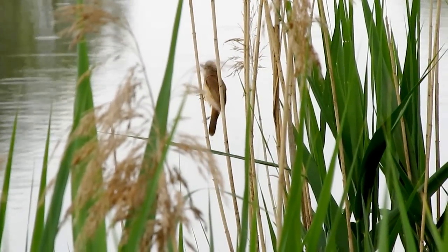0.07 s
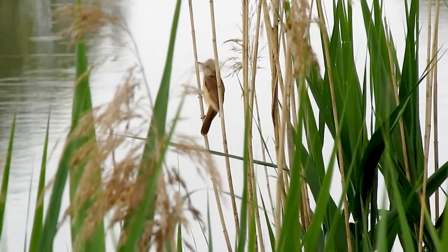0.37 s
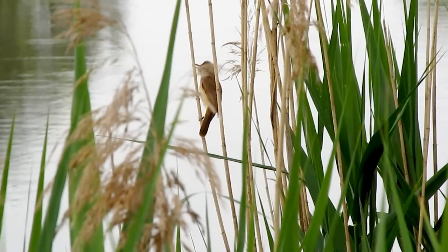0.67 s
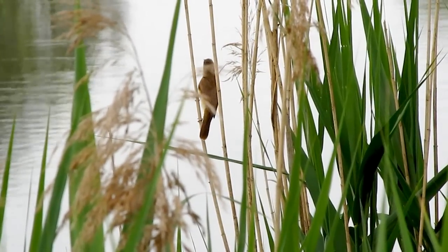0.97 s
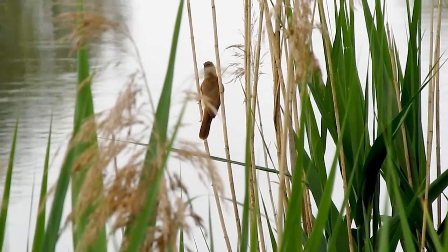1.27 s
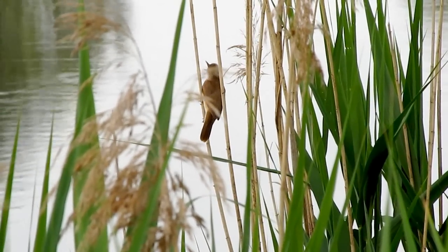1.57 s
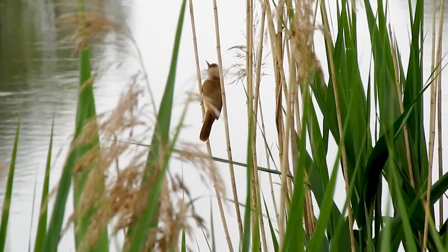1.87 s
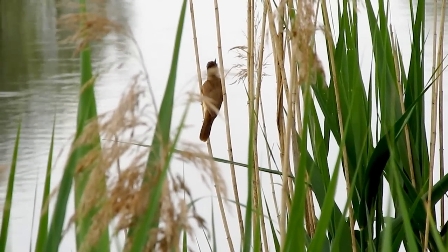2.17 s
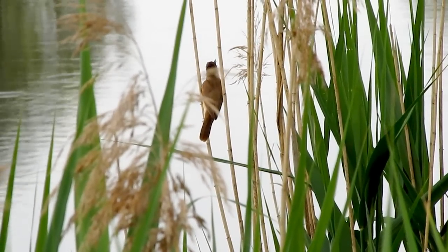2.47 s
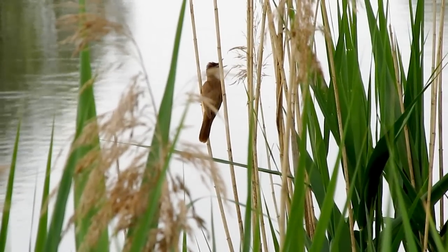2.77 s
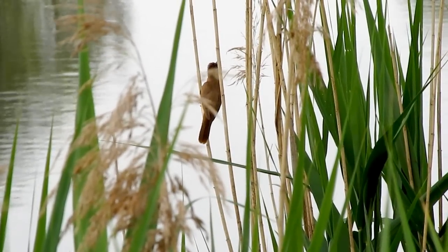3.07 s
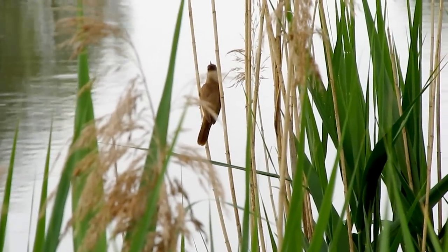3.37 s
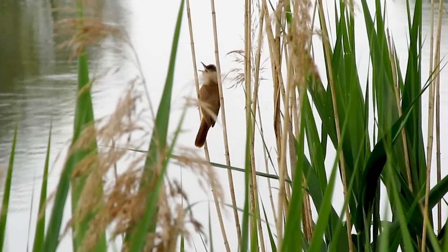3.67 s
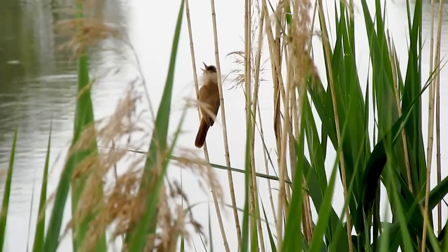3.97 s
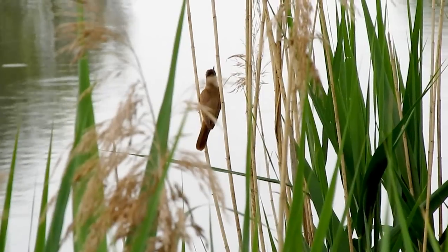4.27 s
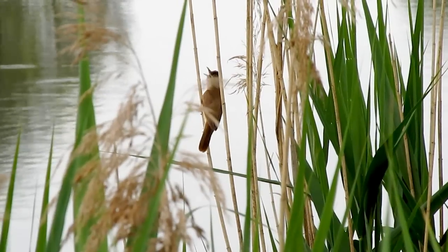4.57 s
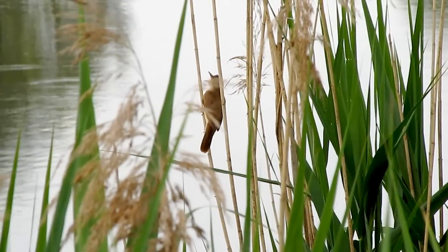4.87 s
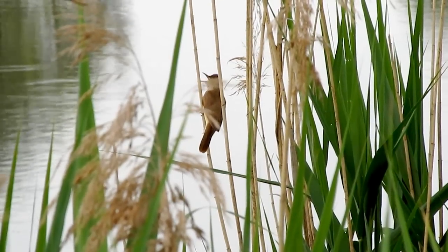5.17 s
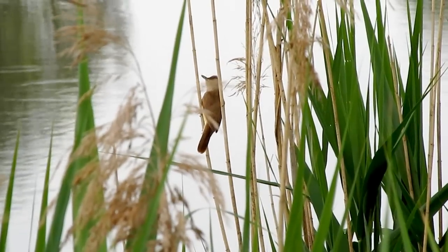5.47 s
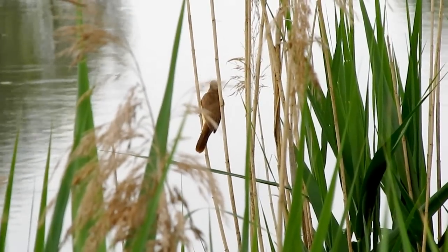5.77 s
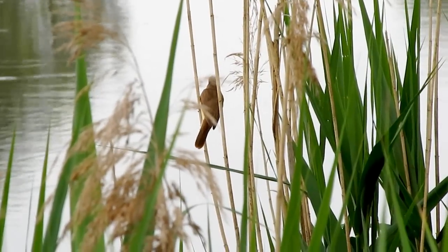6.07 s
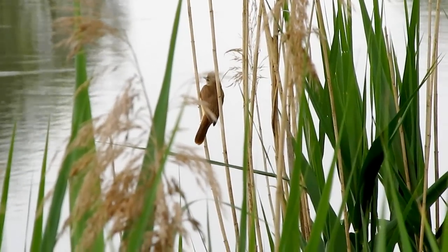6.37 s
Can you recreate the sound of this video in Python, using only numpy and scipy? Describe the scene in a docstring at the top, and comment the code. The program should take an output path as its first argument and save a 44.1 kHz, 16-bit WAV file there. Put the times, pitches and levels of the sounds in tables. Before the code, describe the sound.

Loud, harsh warbler song of dry ticks, rolling rattles and repeated squeaky notes, with other birds faint in the distance.

```python
"""Over a faint outdoor hush and a far chirp, a reed warbler starts ticking dryly beside a pond.
It builds into harsh rattles and repeated squeaky syllables as its syrinx flips between clean tones
and chaotic pulsing that rings its throat and beak. Water, reeds and the far bank answer the song.
Other birds chirp, whistle and twitter in the distance, and one soft knock falls near the end.
A fast limiter holds down the loudest notes."""
import sys
import numpy as np
from scipy import signal
from scipy.fft import rfft, irfft, next_fast_len
from scipy.io import wavfile
from scipy.ndimage import uniform_filter1d, minimum_filter1d, map_coordinates

SR = 44100
rng = np.random.default_rng(int(sys.argv[2]) if len(sys.argv) > 2 else 0)


def output_pcm(signal):
    """Save a mono or channel-first signal as 16-bit PCM at the path in sys.argv[1].

    Samples are clipped to [-1, 1] before scaling.
    """
    pcm = np.clip(np.atleast_2d(signal).T, -1, 1) * 32767
    wavfile.write(sys.argv[1], SR, np.round(pcm).astype(np.int16))


N = 283122


def amp(db):
    """Decibels to gain."""
    return 10 ** (np.asarray(db) / 20)


def unit(x):
    """Scale to rms 1."""
    return x / np.sqrt(np.mean(x ** 2) + 1e-20)


def along(points, hz):
    """Read a curve of (freq_hz, value) points on a log frequency axis."""
    freqs, values = np.transpose(points)
    return np.interp(np.log(hz + 1), np.log(freqs + 1), values)


def wobble(rate, size):
    """A smooth random curve with rate knots a second."""
    knots = rng.standard_normal(int(size * rate / SR) + 4)
    return map_coordinates(knots, [np.arange(size) * rate / SR])


def filtered(x, response):
    """Equalise x with a gain that is a function of frequency."""
    size = next_fast_len(N + SR // 2)
    return irfft(rfft(x, size) * response(np.fft.rfftfreq(size, 1 / SR)), size)[..., :N]


def add(track, start_s, sound):
    """Mix a sound into a track."""
    part = track[..., max(round(start_s * SR), 0):][..., :sound.shape[-1]]
    part += sound[..., :part.shape[-1]]


# Colour of the ambience: freq_hz, level_db
HUSH_SPECTRUM = [(15, -43), (25, -11), (65, -2), (331, -4.5), (598, -6.5), (1950, -9.5), (2850, -6.5),
                 (3340, -10.5), (5010, -13.5), (13000, -27.5), (15500, -37)]
# How alike its left and right are: freq_hz, correlation
HUSH_LIKENESS = [(60, 0.51), (950, 0.15), (15000, -0.42)]

def hush(level_db=-45.5, patchy_db=2.5):
    """Faint air, water and far-off country noise, gently patchy and narrowest in the bass."""
    spectra = signal.stft(rng.standard_normal((2, N)), nperseg=512)[2]
    patches = uniform_filter1d(rng.standard_normal(spectra.shape[1:]), size=5, axis=0)
    patches = uniform_filter1d(patches, size=14, axis=1)
    noise = signal.istft(spectra * amp(patchy_db * unit(patches)), nperseg=512)[1][:, :N]
    width = lambda hz: np.arccos(np.clip(along(HUSH_LIKENESS, hz), -1, 1)) / 2
    colour = lambda hz: amp(along(HUSH_SPECTRUM, hz)) * [np.cos(width(hz)), np.sin(width(hz))]
    mid, side = filtered(noise, colour)
    return amp(level_db) * np.array([mid + side, mid - side]) / np.std(mid)


def whistle(pitch):
    """A small bird's pure note, with soft ends and a slightly unsteady level."""
    size = len(pitch)
    level = amp(2 * wobble(90, size)) * signal.windows.tukey(size, .5)
    return np.sqrt(2) * np.sin(2 * np.pi * np.cumsum(pitch) / SR) * level


# Far chirps: start_s, length_s, first_hz, last_hz, level_db
CHIRP_NOTES = [(0.108, 0.055, 2900, 2600, -42.5), (0.552, 0.105, 3140, 2640, -42.5),
               (0.876, 0.017, 6500, 4900, -44), (.884, .036, 3650, 3020, -48),
               (0.901, 0.029, 6850, 4500, -37), (.931, 0.034, 7080, 5270, -35),
               (1.395, 0.04, 6500, 5370, -47), (4.825, .045, 2250, 2700, -42),
               (4.863, 0.021, 3106, 2880, -29), (5.012, .04, 2220, 2700, -39),
               (5.765, .042, 3100, 3170, -47), (6.148, .05, 3580, 3520, -48)]

def distant_chirps():
    """Short notes whose pitch bends ever faster."""
    out = np.zeros(N)
    for start_s, length_s, first_hz, last_hz, db in CHIRP_NOTES:
        progress = np.linspace(0, 1, int(length_s * SR))
        add(out, start_s, amp(db) * whistle(first_hz + (last_hz - first_hz) * progress ** 1.7))
    return out


def ring(spectrum, size=1024):
    """The minimum-phase ring that one pulse leaves in a cavity with this spectrum."""
    cepstrum = irfft(np.log(amp(along(spectrum, np.fft.rfftfreq(size, 1 / SR)))))
    causal_fold = 1 + np.sign(size // 2 - np.arange(size)) * (np.arange(size) > 0)
    return irfft(np.exp(rfft(cepstrum * causal_fold)))


def rasp(throat, size, slap_hz=1150, uneven=.45, air=.012, steady_s=.005):
    """Chaotic syrinx: uneven slaps ring the throat, at the steady power that the air flow supplies."""
    gaps = np.exp(uneven * rng.standard_normal(int(2 * size * slap_hz / SR) + 8))
    at = np.cumsum(gaps) * SR / slap_hz
    slaps = np.bincount(at[at < size].astype(int), minlength=size) + air * rng.standard_normal(size)
    voice = signal.fftconvolve(slaps, ring(throat))[:size]
    power = np.abs(uniform_filter1d(voice ** 2, int(steady_s * SR)))
    return voice / np.sqrt(power + 1e-12)


def rattle(puffs, throat, length_s, edge, tail_db, tail_s=.0061, lead_s=.0011, split_hz=5500):
    """Puffs of air drive the rasp; each starts bright and dies away in a short, dull tail."""
    t = np.arange(N) / SR
    body_power, treble_power = np.zeros((2, N))
    puff = lambda age: np.exp(-np.abs(2 * age / length_s) ** edge / 2)  # a higher edge is squarer
    for centre_s, db in puffs:
        near = slice(max(int((centre_s - .1) * SR), 0), int((centre_s + .1) * SR))
        age = t[near] - centre_s
        tail = amp(tail_db) * (age > 0) * np.exp(-np.abs(age) / (2 * tail_s))
        body_power[near] += (amp(db) * np.maximum(puff(age), tail)) ** 2
        treble_power[near] += 2 * (amp(db) * puff(age) * puff(age + lead_s)) ** 2
    voice = rasp(throat, N)
    body = filtered(voice, lambda hz: 1 / (1 + (hz / split_hz) ** 10))
    return np.sqrt(body_power) * body + np.sqrt(treble_power) * (voice - body)


def beats(phrases, rhythm):
    """Play one rhythm in every phrase, giving puffs as (centre_s, level_db)."""
    return [(accent_s + stretch * offset_s, phrase_db + db)
            for accent_s, phrase_db, stretch in phrases for offset_s, db in rhythm]


# Tick phrases: accent_s, level_db, stretch_ratio
TICK_PHRASES = [(.238, -23.5, .9), (.466, -21, .9), (.697, -18.5, 1)]
# Puffs of one phrase: offset_s, level_db
TICK_PUFFS = [(-.042, -22.5), (-.019, -8), (0, -0.5), (0.027, -12)]
# Throat and beak resonance, also for kreks and grunts: freq_hz, gain_db
TICK_THROAT = [(600, -44), (850, -31.5), (1120, -17), (1400, -19), (1800, -11.5), (2050, -1.5), (2640, -9),
               (3200, -13), (5300, -38.5), (15000, -60.5)]

def ticks():
    """Dry ticks: three puffs grow quickly to the accent and a soft one trails."""
    return rattle(beats(TICK_PHRASES, TICK_PUFFS), TICK_THROAT, length_s=.0135, edge=6, tail_db=-18)


def gesture(attack_s, hold_s, release_s, swell=2, ebb=.66, glide_per_s=0, scoop=0, droop=0,
            droop_power=2, rough=.02, fray=.45, crack=0, crack_s=0, sag_db=0, sag_s=0):
    """One push of air swells, holds and ebbs; the tone scoops, glides, droops and frays at its ends."""
    t = np.arange(-attack_s - hold_s / 2, hold_s / 2 + release_s, 1 / SR)  # 0 is mid-hold
    rise = np.clip((-t - hold_s / 2) / attack_s, 0, 1)
    fall = np.clip((t - hold_s / 2) / release_s, 0, 1)
    position = np.linspace(-1, 1, len(t))
    scooping = scoop * np.maximum(-position, 0) ** 3.76
    drooping = droop * np.maximum(position, 0) ** droop_power
    cracking = crack * np.exp(-((t - crack_s) / .0045) ** 2)  # a brief rasp that kicks the pitch up
    pitch_ratio = 1 + glide_per_s * t + .045 * cracking - scooping - drooping
    sag = sag_db * np.exp(-((t - sag_s) / .003) ** 2)
    effort_db = -24 * (rise ** swell + fall ** ebb) - sag
    roughness = np.clip(rough + fray * (rise + fall) ** 3.04 + cracking, 0, 1)
    return t, pitch_ratio, effort_db, roughness


def syllables(notes, shape, harmonics, jitter=.0077, shimmer_db=3.5, flutter=.036, rasp_db_per_oct=0):
    """Sing one gesture on every note: a harmonic tone that breaks into rasp where it is rough."""
    out = np.zeros(N)
    t, pitch_ratio, effort_db, roughness = shape
    size = len(t)
    fade = signal.windows.tukey(size, .12)
    tilt_db_per_oct = .1 * effort_db  # more effort, stronger overtones
    for centre_s, hz, db in notes:
        arch = pitch_ratio ** rng.normal(1, .22)  # each note bends by its own amount
        waver = 1 + jitter * wobble(169.4, size) + flutter * np.sqrt(roughness) * wobble(901.6, size)
        phase = 2 * np.pi * np.cumsum(hz * arch * waver) / SR
        tone = np.zeros(size)
        for k, level in enumerate(harmonics, 1):
            gain = amp(level + tilt_db_per_oct * np.log2(k / 2) + shimmer_db * wobble(108, size))
            tone += gain * np.sin(k * phase + rng.uniform(0, 2 * np.pi))
        # The rasp passes the same throat as the harmonics and falls away beyond them.
        throat = [(k * hz, level) for k, level in enumerate(harmonics, 1)]
        throat = [(hz / 2, harmonics[0] - 30), *throat, (SR / 2, harmonics[-1] - 14)]
        throat = [(freq, level + rasp_db_per_oct * np.log2(freq / hz)) for freq, level in throat]
        voice = np.sqrt(1 - roughness) * unit(tone) + np.sqrt(roughness) * rasp(throat, size)
        add(out, centre_s + t[0], amp(db + effort_db) * fade * voice)
    return out


# Krek notes: centre_s, pitch_hz, level_db
KREK_NOTES = [(1.132, 1101, -8), (1.367, 1107, -7.5)]
# Their harmonics, from the fundamental up: level_db
KREK_HARMONICS = [-33, 0, -24, -42, -49, -46, -54, -58]
# Lead-in ticks and the snap: offset_s, level_db
KREK_PUFFS = [(-.072, -32.5), (-.045, -15.5), (-.023, -10)]
SNAP_PUFF = [(.0036, -20.5)]
# Bright throat resonance of the snap: freq_hz, gain_db
SNAP_THROAT = [(1000, -36), (3000, 1), (5000, -14.5), (6800, -6.5), (9000, -21), (12000, -19.5),
               (15500, -28)]

def kreks(leap_ratio=1.27, leap_s=.012, leap_db=-9):
    """Three growing ticks burst into a loud tone, which snaps and leaps to a higher, rougher note."""
    phrases = [(s, db, 1) for s, hz, db in KREK_NOTES]
    leaps = [(s + leap_s, hz * leap_ratio, db + leap_db) for s, hz, db in KREK_NOTES]
    low = gesture(attack_s=.013, hold_s=.017, release_s=.019, ebb=.76, glide_per_s=.81,
                  rough=.06, fray=.31, crack=.36, crack_s=.015)
    high = gesture(attack_s=.0046, hold_s=.01, release_s=.0086, rough=.25)
    return (rattle(beats(phrases, KREK_PUFFS), TICK_THROAT, length_s=.015, edge=6.7, tail_db=-39)
            + rattle(beats(phrases, SNAP_PUFF), SNAP_THROAT, length_s=.016, edge=1, tail_db=-25)
            + syllables(KREK_NOTES, low, KREK_HARMONICS, jitter=.016)
            + syllables(leaps, high, KREK_HARMONICS, jitter=.016))


# Tsik and wheeze notes: centre_s, pitch_hz, level_db
TSIK_NOTES = [(1.572, 2502, -15), (1.791, 2484, -11), (2.014, 2470, -10)]
WHEEZE_NOTES = [(1.691, 1577, -13.5), (1.912, 1549, -11.5), (2.128, 1555, -10.5)]
# Their harmonics, from the fundamental up: level_db
TSIK_HARMONICS = [-12, -1.5, -21.5, -20.5, -35, -41]
WHEEZE_HARMONICS = [-19, -4, -8.5, -1.5, -19, -19, -26, -34, -41, -45.5]

def tsik_wheezes():
    """A sharp, arched high note alternates with a slowly swelling wheeze; both crack at their peak."""
    tsik = gesture(attack_s=.03, hold_s=.0043, release_s=.037, swell=1, ebb=.95,
                   scoop=.0768, droop=.073, rough=.09, fray=1, crack=.625, crack_s=.00085)
    wheeze = gesture(attack_s=.064, hold_s=.008, release_s=.022, swell=.94, ebb=.47,
                     glide_per_s=-.503, rough=.03, fray=.3, crack=.22, crack_s=.002)
    return (syllables(TSIK_NOTES, tsik, TSIK_HARMONICS, jitter=.008, rasp_db_per_oct=2)
            + syllables(WHEEZE_NOTES, wheeze, WHEEZE_HARMONICS, jitter=.01, rasp_db_per_oct=6))


# Clicks: centre_s, level_db
BEAK_CLICKS = [(1.759, -24), (1.981, -22.5), (5.154, -26)]
# Ring of the beak: freq_hz, gain_db
BEAK_RING = [(1500, -18.5), (2200, -12), (4200, -0.5), (6500, -22), (14000, -37)]

def beak_clicks():
    """A tiny, bright click of the beak just before some notes."""
    return rattle(BEAK_CLICKS, BEAK_RING, length_s=.0024, edge=5.9, tail_db=-3.5)


# Churr phrases: accent_s, level_db, stretch_ratio
CHURR_PHRASES = [(2.331, -3.5, 0.91), (2.507, -5.5, 0.93), (2.768, -3, 0.92), (2.942, -4, 0.97)]
# Puffs of one phrase: offset_s, level_db
CHURR_PUFFS = [(-.075, -19), (-.063, -12), (-.051, -6), (-.038, -7), (-.026, -2.5), (-.0125, -4.5), (0, -2),
               (0.03, -6), (0.041, -12.5)]
# Throat and beak resonance: freq_hz, gain_db
CHURR_THROAT = [(650, -86), (1120, -39), (1530, -28), (2200, -27), (2600, -11), (2950, -4), (3300, -15),
                (3900, -22.5), (5000, -35), (7100, -42), (9200, -35), (12300, -56), (15500, -67)]

def churrs():
    """A soft lead-in, a fast roll that swells to the accent, a gap and a closing double puff."""
    puffs = beats(CHURR_PHRASES, CHURR_PUFFS)
    return rattle(puffs, CHURR_THROAT, length_s=.0095, edge=2.3, tail_db=-10.5, lead_s=.0008)


# Kee and keer notes: centre_s, pitch_hz, level_db
KEE_NOTES = [(3.174, 1497, -12), (3.376, 1479, -14), (3.599, 1511, -12), (3.822, 1522, -10)]
KEER_NOTES = [(3.238, 1501, -7), (3.439, 1500, -6), (3.664, 1504, -6), (3.89, 1502, -6)]
# Their harmonics, from the fundamental up: level_db
KEE_HARMONICS = [-22, 0, -23.5, -40, -28, -32, -42, -53]
KEER_HARMONICS = [-24, -1, -23, -31.5, -38, -26, -36.5, -43, -49, -47]
# Single puffs, a grunt before each later kee and a rasp ending every kee: centre_s, level_db
GRUNT_PUFFS = [(3.331, -31.5), (3.552, -39), (3.777, -35)]
RASP_PUFFS = [(3.191, -18), (3.395, -17), (3.62, -19), (3.844, -17.5)]

def kee_keers():
    """Paired arches that fall steeply: a clear kee, then a hoarse keer that sags briefly and frays."""
    kee = gesture(attack_s=.036, hold_s=.018, release_s=.017, swell=1.7, ebb=2.2,
                  scoop=.09, droop=.36, droop_power=7, rough=.002, fray=.14)
    keer = gesture(attack_s=.013, hold_s=.035, release_s=.022, swell=.9, ebb=1.3,
                   scoop=.2, droop=.29, droop_power=3, rough=.004, fray=.16, sag_db=3.5, sag_s=-.008)
    return (syllables(KEE_NOTES, kee, KEE_HARMONICS, jitter=.007, shimmer_db=1.8, rasp_db_per_oct=2)
            + syllables(KEER_NOTES, keer, KEER_HARMONICS, jitter=.009, shimmer_db=2.8,
                        flutter=.13, rasp_db_per_oct=4)
            + rattle(GRUNT_PUFFS, TICK_THROAT, length_s=.014, edge=2.9, tail_db=-14)
            + rattle(RASP_PUFFS, CLACK_THROAT, length_s=.012, edge=2.1, tail_db=-14))


# Clack phrases: accent_s, level_db, stretch_ratio
CLACK_PHRASES = [(4.086, -8.5, 0.99), (4.368, -7.5, 1), (4.652, -9, 0.997)]
# Puffs of one phrase: offset_s, level_db
CLACK_PUFFS = [(-.026, -20.5), (0, -0.5), (0.0164, -0.5), (0.0305, 0), (0.043, 0), (0.0761, -1),
               (.1088, -1.5), (0.1358, -4.5), (0.153, -3)]
# Throat and beak resonance, also for the rasp ending a kee: freq_hz, gain_db
CLACK_THROAT = [(700, -53), (1100, -25), (1500, -21.5), (2000, -19.5), (2400, -3.5), (2800, -1.5),
                (3300, -10.5), (4000, -15.5), (5000, -28), (7100, -36.5), (9000, -25), (11500, -53),
                (15500, -61)]

def clacks():
    """A faint lead-in, a roll of four, two separate beats and a weaker closing pair."""
    puffs = beats(CLACK_PHRASES, CLACK_PUFFS)
    return rattle(puffs, CLACK_THROAT, length_s=.0095, edge=3.6, tail_db=-8.5, tail_s=.0055, lead_s=.002)


# Far whistles: start_s, length_s, first_hz, last_hz, level_db, trill_depth_hz, trill_rate_hz
WHISTLE_NOTES = [(4.815, 0.11, 1840, 1898, -39, -7, -2), (5.318, 0.075, 2182, 2130, -33, 60, 18),
                 (5.84, 0.16, 4100, 3750, -51, 355, 110.5), (5.911, 0.16, 3220, 2950, -45, 257, 109.5),
                 (6.037, .13, 2686, 2426, -45, 260, 67), (5.98, 0.21, 2085, 2148, -33.5, 8, -8),
                 (6.119, 0.37, 2100, 2190, -40, 195, 93)]

def distant_whistles():
    """Notes that glide and settle while an uneven trill rocks their pitch."""
    out = np.zeros(N)
    for start_s, length_s, first_hz, last_hz, db, depth_hz, rate_hz in WHISTLE_NOTES:
        progress = np.linspace(0, 1, int(length_s * SR))
        trill_phase = 2 * np.pi * rate_hz * length_s * progress + .7 * wobble(45, len(progress))
        glide = last_hz + (first_hz - last_hz) * (1 - progress) ** 1.385
        add(out, start_s, amp(db) * whistle(glide + depth_hz * signal.sawtooth(trill_phase, .3)))
    return out


# Chaff, whip and squeal notes: centre_s, pitch_hz, level_db
CHAFF_NOTES = [(4.972, 1393, -10), (5.181, 1427, -6.5), (5.397, 1415, -8)]
WHIP_NOTES = [(4.988, 1943, -10), (5.198, 1902, -8.5), (5.416, 1920, -7)]
SQUEAL_NOTES = [(5.065, 1444, -10), (5.271, 1474, -10), (5.49, 1448, -11.5)]
# Their harmonics, from the fundamental up: level_db
CHAFF_HARMONICS = [-24, -10, -5, 0.5, -19.5, -19.5, -23, -28.5, -35, -35, -50]
WHIP_HARMONICS = [-26, -5.5, -32, -38, -34, -46, -54]
SQUEAL_HARMONICS = [-16.5, 1, -0.5, 8, -12, -12.5, -15, -24, -26, -47]

def chaff_squeals():
    """A harsh chaff clears into a rising whip; a longer squeal follows and cracks as it ends."""
    chaff = gesture(attack_s=.023, hold_s=.009, release_s=.012, swell=.72, ebb=1.3, rough=.42, fray=1)
    whip = gesture(attack_s=.0072, hold_s=.013, release_s=.02, swell=2.7, ebb=.4,
                   glide_per_s=6.5, scoop=.037, droop=.05, rough=.05, fray=.66)
    squeal = gesture(attack_s=.042, hold_s=.018, release_s=.016, swell=1.05, ebb=1.08,
                     scoop=.014, droop=.03, rough=.02, fray=.3, crack=.25, crack_s=.012)
    return (syllables(CHAFF_NOTES, chaff, CHAFF_HARMONICS)
            + syllables(WHIP_NOTES, whip, WHIP_HARMONICS)
            + syllables(SQUEAL_NOTES, squeal, SQUEAL_HARMONICS, jitter=.007, shimmer_db=3))


def distant_twitter(start_s=5.078, end_s=5.3, notes_per_s=39, note_s=.023, level_db=-34):
    """A quick run of separate rising notes, each tuned a little differently."""
    out = np.zeros(N)
    rise_hz = np.linspace(2030, 2440, int(note_s * SR))
    for at_s in np.arange(start_s, end_s, 1 / notes_per_s):
        add(out, at_s, amp(level_db) * whistle(rise_hz * rng.normal(1, .012)))
    return out


# Colour of the knock: freq_hz, level_db
KNOCK_SPECTRUM = [(40, -13), (150, -1), (700, -8), (1800, 12), (4000, -25)]

def knock(start_s=6.038, level_db=-42, decay_s=.008):
    """One soft, dull knock nearby: a burst of noise that dies quickly."""
    age = np.arange(N) / SR - start_s
    thud = unit(filtered(rng.standard_normal(N), lambda hz: amp(along(KNOCK_SPECTRUM, hz))))
    return amp(level_db) * thud * (age > 0) * np.exp(-np.abs(age) / decay_s)


# Bounces off the water and the stems: delay_s
BOUNCE_DELAYS = [.00456, .00476]
# Their strengths, negative to invert: gain_ratio
BOUNCE_GAINS = [.27, -.23]

def with_close_reflections(song, dull_hz=5000):
    """Water and stems comb the song, so that a gliding note swells and dips."""
    bounces = lambda hz: sum(gain * np.exp(-2j * np.pi * hz * delay_s)
                             for delay_s, gain in zip(BOUNCE_DELAYS, BOUNCE_GAINS))
    return filtered(song, lambda hz: 1 + bounces(hz) / (1 + (hz / dull_hz) ** 4))


def reverb(x, decay, delay_s):
    """Diffuse answer of the surroundings, different at each ear; decay lists (freq_hz, t60_s)."""
    hz, t, spectra = signal.stft(rng.standard_normal((2, SR)), SR, nperseg=256)
    tail = signal.istft(spectra * amp(-60 * t / along(decay, hz)[:, None]), SR, nperseg=256)[1]
    tail = np.pad(tail / np.linalg.norm(tail[0]), ((0, 0), (int(delay_s * SR), 0)))
    return signal.fftconvolve(np.atleast_2d(x), tail, axes=1)[:, :N]


# Colour of all that comes back from afar: freq_hz, gain_db
FAR_EQ = [(1000, -13), (2200, -9), (3000, 3), (4200, 7), (6000, 3), (12000, 12.5)]
# Distinct echoes: delay_s, send_db
ECHO_TAPS = [(.056, -32), (0.086, -34)]
# Ring of the far bank: freq_hz, t60_s
BANK_DECAY = [(2500, .95), (6000, .62), (12000, 0.1)]

def far_bank(song, wash_send_db=-26, flutter_per_s=520, echo_low_cut_hz=2600):
    """The bank returns two treble echoes and a tail that flutters pure notes into a soft wash."""
    carried = filtered(song, lambda hz: amp(along(FAR_EQ, hz)))
    treble = filtered(carried, lambda hz: 1 - 1 / (1 + (hz / echo_low_cut_hz) ** 10))
    echoes = np.zeros(N)
    for delay_s, db in ECHO_TAPS:
        add(echoes, delay_s, amp(db) * treble)
    flutter = unit(wobble(flutter_per_s, N))
    return echoes + amp(wash_send_db) * reverb(carried * flutter, BANK_DECAY, delay_s=.028)


def scene():
    """The warbler just ahead, close reeds and the far bank around it, other birds beyond."""
    ahead, right = amp([[-.3], [.3]]), amp([[-5], [5]])  # left and right gains
    song = (beak_clicks() + ticks() + kreks() + tsik_wheezes() + churrs()
            + kee_keers() + clacks() + chaff_squeals())
    birds = distant_chirps() + right * (distant_whistles() + distant_twitter())
    reeds = amp(-11) * reverb(song, [(2000, .11), (9000, .12)], delay_s=.0005)
    warbler = ahead * with_close_reflections(song) + reeds + far_bank(song)
    bird_tails = amp(-6) * reverb(birds, [(2000, .5), (6000, .14)], delay_s=.0056)
    return warbler + birds + bird_tails + knock() + hush()


def record(dry, ceiling=.99, reaction_s=.001, top_hz=15700):
    """A fast limiter holds down the loudest peaks; a steep high cut follows."""
    size = int(reaction_s * SR)
    needed = ceiling / np.maximum(np.abs(dry), ceiling)
    gain = uniform_filter1d(minimum_filter1d(needed, size, axis=1), size, axis=1)
    return filtered(dry * gain, lambda hz: hz < top_hz)


dry = scene()
out = record(dry)
output_pcm(out)
```